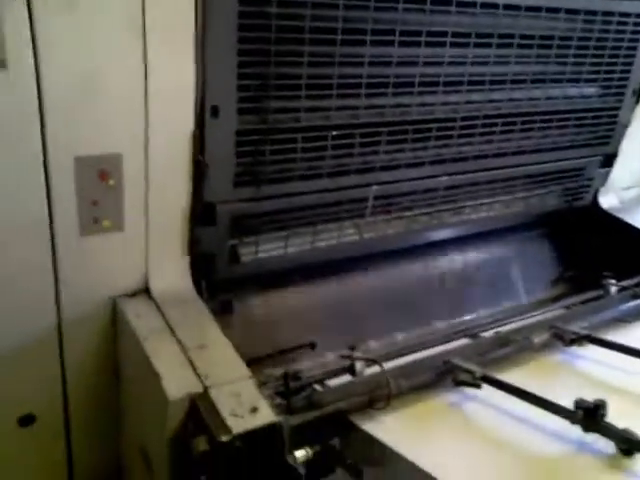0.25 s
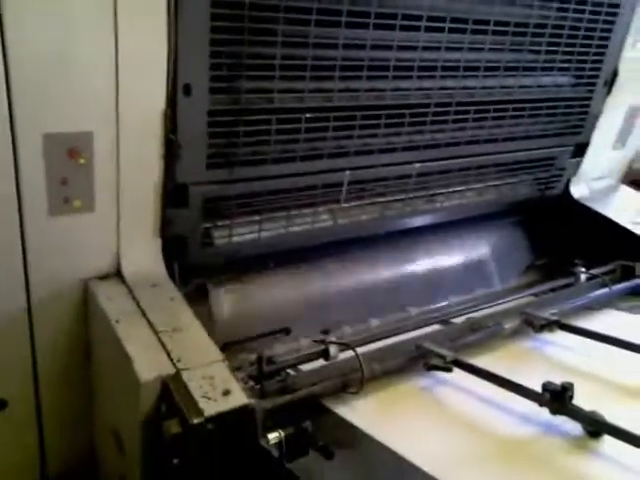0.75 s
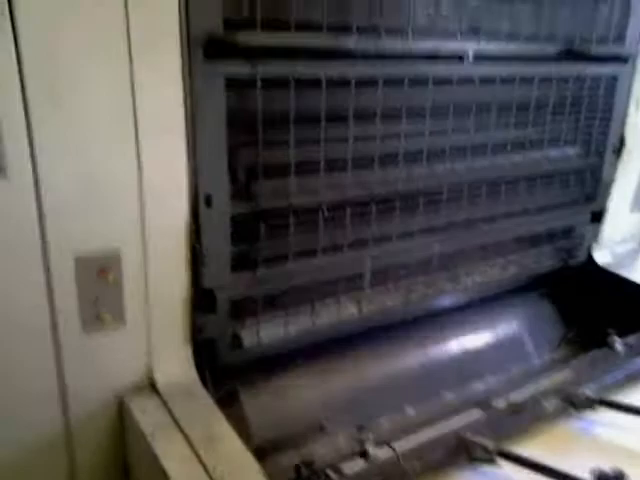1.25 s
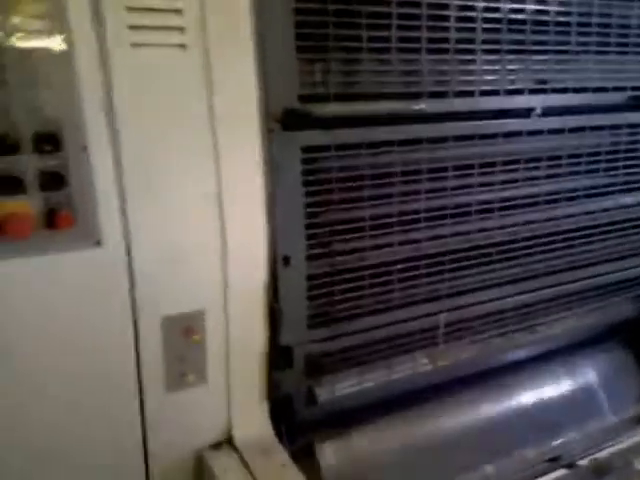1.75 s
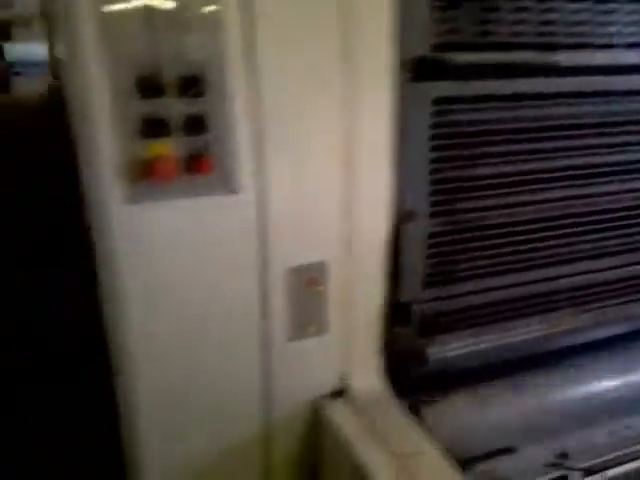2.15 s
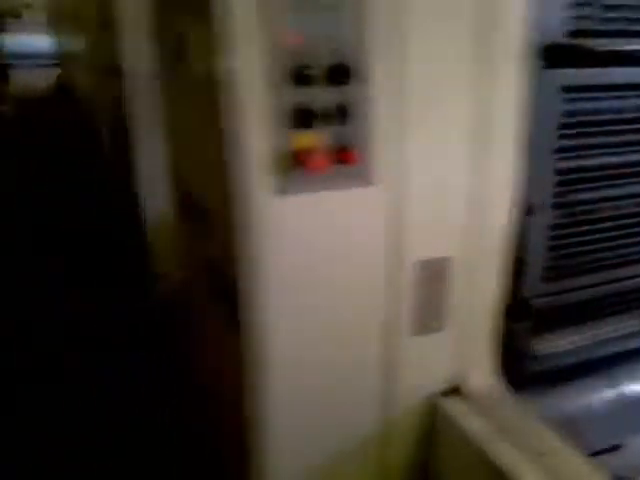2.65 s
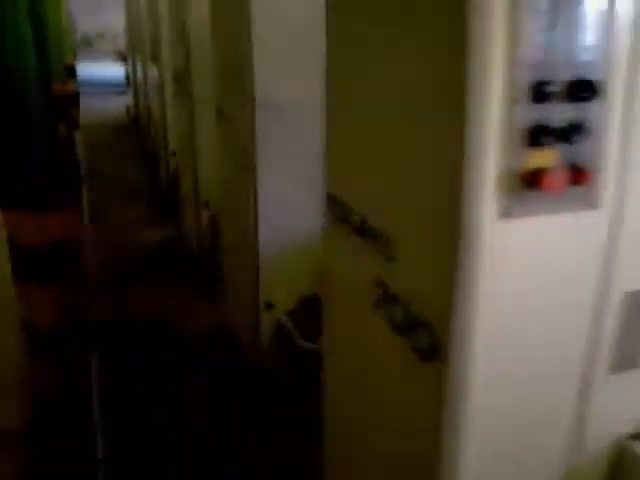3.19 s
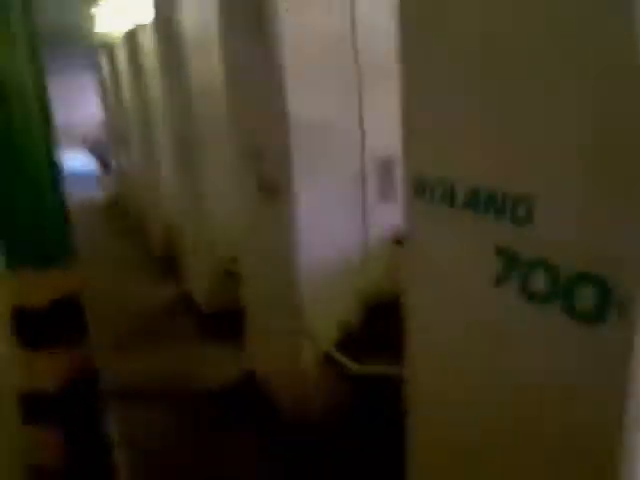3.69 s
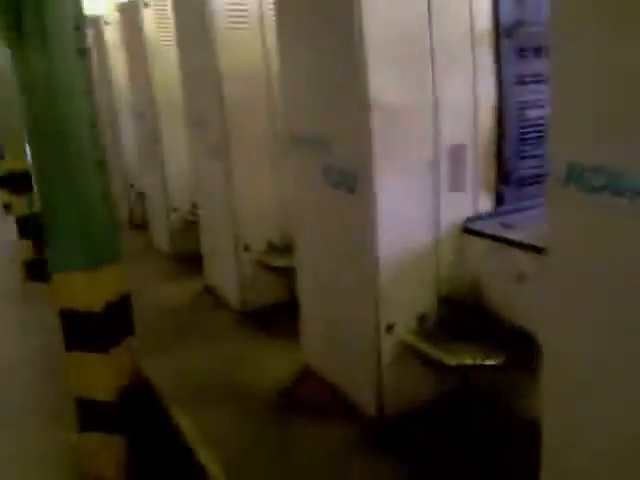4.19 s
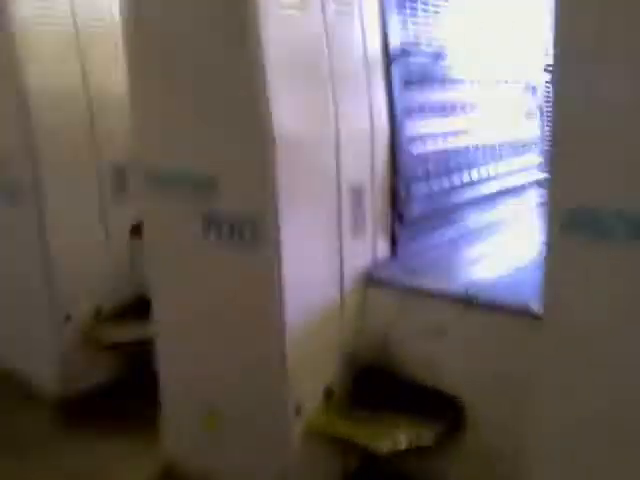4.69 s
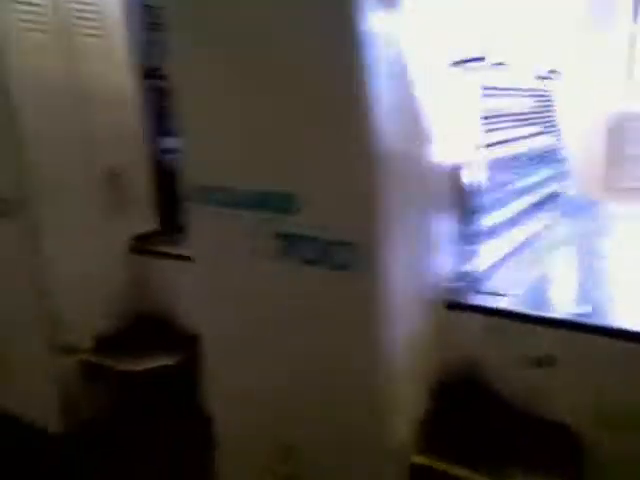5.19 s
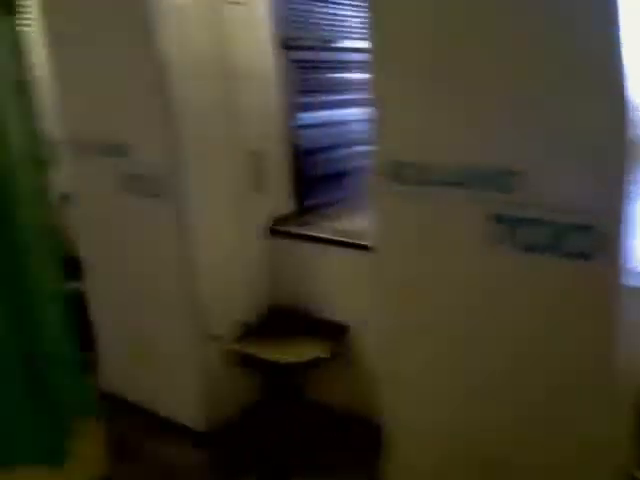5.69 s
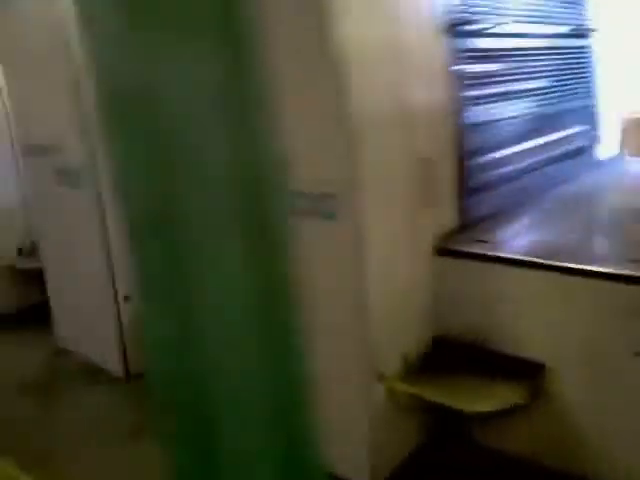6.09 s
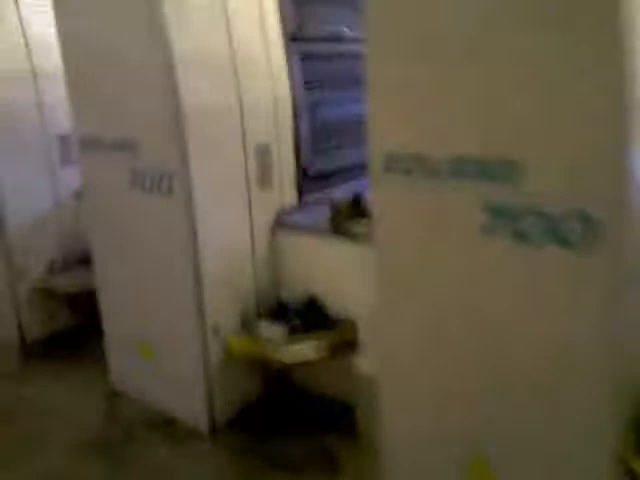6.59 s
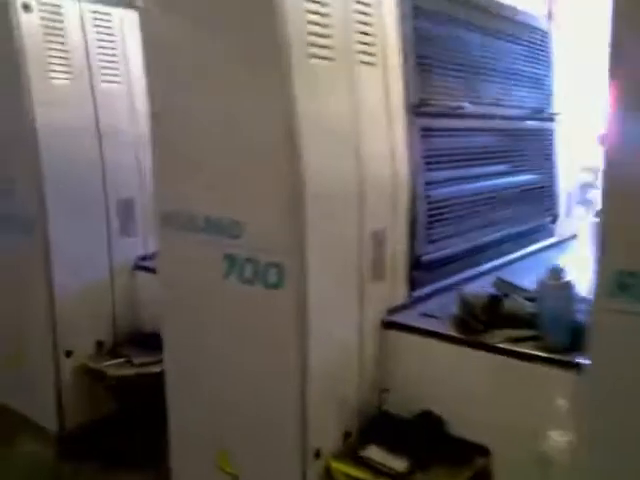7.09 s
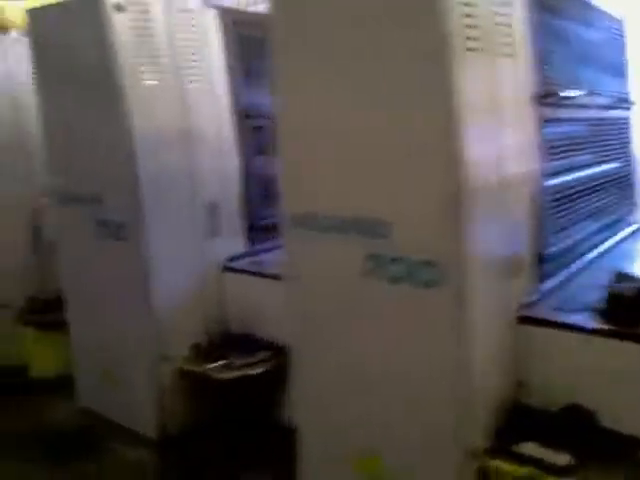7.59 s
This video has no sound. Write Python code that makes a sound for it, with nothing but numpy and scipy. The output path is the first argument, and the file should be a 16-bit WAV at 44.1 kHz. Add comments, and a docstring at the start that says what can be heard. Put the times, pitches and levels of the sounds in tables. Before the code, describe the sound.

Fast regular double metal clanks and dull thuds pound through a dense machine roar, suction puffs fading along the press, with thin, crackly sound.

```python
"""A sheet-fed printing press at full speed: each sheet brings two gripper clanks, two frame thuds and suction hiss.
Struck parts are damped modes plus noise; din and air are shaped noise, rattle is random impacts, whines are sines.
The listener starts near the feeder and walks off along the printing units: suction falls, blows blur into echo.
A narrow-band recorder thins the bass and limits peaks; treble crackles, timed by table, and faint ticks are added."""
import sys
import numpy as np
from scipy import signal
from scipy.fft import rfft, irfft
from scipy.io import wavfile
from scipy.ndimage import uniform_filter1d, minimum_filter1d

SR = 44100
rng = np.random.default_rng(int(sys.argv[2]) if len(sys.argv) > 2 else 0)


def to_wav(s):
    """Save 16-bit WAV."""
    ch = np.atleast_2d(s).T  # columns
    pcm = np.round(np.clip(ch, -1, 1) * 32767)  # PCM
    wavfile.write(sys.argv[1], SR, pcm.astype(np.int16))


N = 346185
FRAMES = N // 256 + 5  # noise frames, 256 samples apart

# Levels are ahead of echo mix and recorder; spectrum and mode levels are relative.
# walk: t/s, distance from feeder/m
WALK = [(0, 1.46), (1.5, 1.26), (2.4, 1.18), (3.2, 2.64), (5, 2.87), (6.6, 3.1), (7.85, 3.7)]
# din spectrum: f/Hz, density level/dB
DIN_SPECTRUM = [(20, -34.5), (45, -10), (80, -11), (100, -6.5), (125, -7.5), (160, -11), (210, -1.5),
                (245, 1.5), (285, -1.5), (340, 1.5), (480, -7.5), (790, -4.5), (1030, -9), (1410, -8),
                (2000, -6.5), (2650, -10.5), (3330, -6.5), (3700, -9), (4800, -23.5)]
# gear mesh and fan tones, each from a part passed: f/Hz, nearest t/s, rms level there/dB, time to fall 3 dB/s
WHINES = [(590, 4.2, -28.5, .85), (592, 2.4, -34, .5), (590, 6.3, -36, .5), (801, 6.6, -33, .9),
          (801, 3.8, -35, .8), (802, .5, -37, .6), (214, 6.9, -36, .6), (1710, 4.75, -32, .4),
          (1710, .6, -35, 1.2), (1711, 6.8, -37, 1.2), (1866, 4.4, -32, 2.1), (1866, 7.4, -35, .6),
          (1969, .7, -33, 1), (1974, 5.8, -34, 2.5)]
# sheets: first clank t/s, peak level/dB of first clank, second clank, first thud, second thud
SHEETS = [(0.08, 3, 0, -11.5, -20), (0.4437, -1, -1, -10, -18), (0.8018, -0.5, 1.5, -11.5, -14),
          (1.1587, 0.5, 0, -11.5, -13.5), (1.517, 1.5, 0.5, -9, -13), (1.8765, -1, -2, -10.5, -24),
          (2.2386, -1, 0, -11.5, -12), (2.595, -2.5, -2, -12.5, -16), (2.949, -3.5, -3.5, -12.5, -17),
          (3.3187, -2, -3, -16.5, -22), (3.68, -6.5, -2.5, -24, -19), (4.0313, -4, -6, -32, -23),
          (4.3987, -4.5, -3, -19, -20), (4.758, -6.5, -9, -13, -24), (5.12, -6, -3, -14.5, -15),
          (5.469, -3, -7, -17.5, -16.5), (5.829, -2, -3, -25, -18), (6.2, -4, -4.5, -17.5, -20.5),
          (6.5602, -7, -5.5, -22, -20), (6.9115, -5, -5.5, -18, -19.5), (7.279, -6.5, -5, -20, -13.5),
          (7.6401, -8, -1.5, -15.5, -18)]
# suction of one sheet: t from first clank/s, level/dB
AIR_ENVELOPE = [(-.14, -0.5), (-.09, -1.5), (-.03, 1.5), (.03, 1), (.07, -25.5)]
# suction spectrum: f/Hz, density level/dB
AIR_SPECTRUM = [(800, -5.5), (1800, 2.5), (2600, 5.5), (3400, 2.5), (5000, -7.5)]
# crackles: t/s, peak level/dB, rms re peak of the hiss around a tick/dB
CRACKLES = [(0.0598, -34, -33), (0.0832, -19, -32), (0.1115, -19.5, -34), (0.2703, -21, -35),
            (0.354, -25, -30), (0.4433, -23, -28), (0.4733, -24, -27), (0.5886, -32, -27),
            (0.612, -32, -28), (0.6734, -30, -38), (0.7826, -39, -35), (0.8011, -22, -26),
            (0.8174, -21, -31), (0.833, -22, -42), (0.9482, -24, -32), (0.9572, -19.5, -29),
            (0.9744, -28, -31), (1.0226, -33, -33), (1.074, -39, -33), (1.0919, -22, -34),
            (1.159, -21, -29), (1.172, -18, -32), (1.1947, -35, -33), (1.3034, -20, -31),
            (1.3698, -27, -31), (1.436, -31, -30), (1.4636, -40, -36), (1.5224, -28, -31),
            (1.534, -22, -19.5), (1.5594, -22, -29), (1.6656, -21.5, -28), (1.6944, -24, -30),
            (1.7923, -36, -23), (1.8811, -24, -33), (1.8891, -23, -25), (1.9066, -21, -33),
            (2.019, -30.5, -26), (2.2353, -38, -35), (2.249, -23, -31), (2.322, -17, -28),
            (2.3531, -22, -37), (2.3835, -19, -36), (2.4085, -24, -30), (2.6075, -26, -25),
            (2.6284, -26, -37), (2.8399, -38, -33), (2.976, -38, -24), (3.1123, -35, -31),
            (3.1273, -23, -34), (3.8944, -47, -32), (4.0375, -20, -55), (4.7727, -31, -33.5),
            (5.1352, -37, -31.5), (5.1487, -31, -32.5), (5.2694, -42, -30), (5.7548, -24, -43),
            (7.458, -30.5, -36)]
# crackle spectrum: f/Hz, density level/dB
CRACKLE_SPECTRUM = [(4300, 8.5), (4700, 9), (4900, 1), (5600, 6), (7000, 5.5), (9000, 1.5), (11000, -1),
                    (12500, -11)]
# clearest dull ticks just above the band: t/s, peak level/dB
SPITS = [(3.3398, -42), (3.497, -41), (3.5488, -39), (4.1614, -37), (4.4488, -39), (5.4645, -42),
         (5.894, -44), (5.9708, -42), (6.3006, -52), (6.4048, -50), (6.4742, -46), (6.5904, -46.5),
         (6.6139, -41), (6.8543, -46), (7.0549, -50), (7.2579, -48), (7.7867, -46)]
# gripper bar modes: f/Hz, level/dB, t60/s
GRIPPER_MODES = [(772, -3.5, 0.075), (1107, -6, 0.043), (1290, -13.5, 0.15), (1380, -18, 0.053),
                 (1640, -4, .09), (1700, -5, .09), (1785, -4, .12), (1822, -3, .12), (1955, -6, .1),
                 (2130, -4, .08), (2425, -4, 0.058), (2540, -13, 0.026), (3355, -11, 0.084),
                 (3480, -11.5, 0.049)]
# loose parts shaken by a blow: f/Hz, density level/dB
CLATTER_SPECTRUM = [(150, -26), (500, -5), (900, 0.5), (1400, -8), (1900, -4), (2600, -4.5), (3400, -6.5),
                    (4500, -6.5)]
# brief loud peaks in the roar: t/s, peak level/dB
LOUD_PEAKS = [(0.28, -11), (0.679, -8), (1.03, -4), (1.09, -15), (1.389, -13), (1.439, -20), (1.789, -6),
              (2.349, 3.5), (3.129, -5.5), (4.771, -1), (5.139, -4), (5.749, -6), (7.453, -14)]
# press frame modes: f/Hz, level/dB, t60/s
FRAME_MODES = [(255, -10, .12), (286, 0, .26), (345, -13, .1)]
# modes of one knock close by: f/Hz, level/dB, t60/s
KNOCK_MODES = [(478, -4, 0.16), (604, -10, 0.12), (746, -4, 0.075)]

DIN_DB, DIN_DB_PER_DECADE = -12.5, -1.5  # rms at 1 m, change over ten times the distance
DIN_TREBLE_DB = -0.6  # treble trim
RATTLE_PER_S, RATTLE_DB, RATTLE_SPREAD_DB = 600, -21, 4  # rate, overall rms, size spread
STANDING_DB, STANDING_HZ = 1.2, .3  # tone swell as the listener crosses standing waves
BEAT_DB, BEAT_HZ, PITCH_WAVER = 2.2, 3.0, .0009  # echo beat, rate of beat and waver, relative pitch rms
AIR_DB, AIR_DB_PER_DECADE = -16.5, -16  # level at 1 m ahead of the envelope, change with distance
HISS_BEFORE_S, HISS_AFTER_S = 0.025, .032  # spread of the hiss around a tick
SPITS_PER_S, SPIT_DB, SPIT_SPREAD_DB = 58, -58, 6  # random dull ticks: rate, median peak, spread
SPIT_TILT_DB_PER_OCT = -45
SECOND_CLANK_S, FIRST_THUD_S, SECOND_THUD_S = .139, 0.01417, .215  # delays
THUD_RISE_S, THUD_SPREAD = .008, .012  # swell, relative pitch scatter
KNOCK_S, KNOCK_DB = 2.312, -3.5  # start, peak
ECHO_M, ECHO_T60_S = 1.77, 0.46  # distance where a blow and its echo are equally loud, decay
MIC_HZ = 84  # microphone bass roll-off
BAND_HZ, SKIRT_HZ, SKIRT_DB = 3743, 4400, -18  # band edge, then a weak shelf: edge, level
LIMIT_PEAK, LIMITER_S = .94, 0.00028  # limiter level, time over which its gain bends
EDGE_HZ = 13000  # final lowpass


def gain_of(db):
    """Decibels to an amplitude factor."""
    return 10 ** (np.asarray(db) / 20)


def evened(x):
    """Scales to rms 1."""
    return x / np.sqrt(np.mean(x ** 2) + 1e-20)


def spectrum_db(points, hz):
    """Interpolates a spectrum table on a log-frequency axis."""
    f, level_db = np.transpose(points)
    return np.interp(np.log(hz + 1), np.log(f + 1), level_db)


def curve(table, t):
    """Second column of a time table at the times t."""
    times, values = np.transpose(table)
    return np.interp(t, times, values)


def distance_m(t):
    """Distance from the feeder at the times t."""
    return np.maximum(curve(WALK, t), .3)


def add(mix, start_s, sound):
    """Adds a sound in place, trimmed to the mix."""
    at = round(start_s * SR)
    part = mix[max(at, 0):][:len(sound) + min(at, 0)]
    part += sound[max(-at, 0):][:len(part)]


def coloured(field_db):
    """Noise whose short-time level follows a field of bins by frames."""
    real, imag = rng.standard_normal((field_db.shape[1], 513, 2)).T
    spectra = (real + 1j * imag) * gain_of(field_db)
    return signal.istft(spectra, nperseg=1024, noverlap=768)[1][:N]


def drift(hz):
    """Random drift of rms 1: one-pole lowpassed noise in 64-sample steps, interpolated."""
    pole = np.exp(-2 * np.pi * hz * 64 / SR)
    steps = signal.lfilter([1], [1, -pole], rng.standard_normal(N // 64 + 2))
    return np.interp(np.arange(N) / 64, np.arange(len(steps)), evened(steps))


def din():
    """Rollers, chains and fans: dense noise in drifting patches, with a flutter shared by the upper bands."""
    hz = np.fft.rfftfreq(1024, 1 / SR)
    patches = rng.standard_normal((FRAMES, len(hz))).T
    patches = uniform_filter1d(patches, size=12, axis=0)  # across frequency
    patches = evened(uniform_filter1d(patches, size=10, axis=1))  # across time
    flutter = evened(uniform_filter1d(rng.standard_normal(FRAMES), size=4))
    treble = np.clip(np.log2((hz + 1) / 700) / 2, 0, 1)[:, None]
    shared = np.clip(np.log2((hz + 1) / 300) / 2, 0, 1)[:, None]
    field_db = spectrum_db(DIN_SPECTRUM, hz)[:, None] + treble * DIN_TREBLE_DB
    field_db = field_db + 0.74 * patches + 0.55 * shared * flutter
    level_db = DIN_DB + DIN_DB_PER_DECADE * np.log10(distance_m(np.arange(N) / SR))
    return gain_of(level_db) * evened(coloured(field_db))


def rattle():
    """Chain links and rollers: random impacts, each ringing one short metal part."""
    size_db = RATTLE_SPREAD_DB * np.minimum(rng.exponential(1, N), 4)
    impacts = gain_of(size_db) * (rng.random(N) < RATTLE_PER_S / SR)
    part, t, out = rng.integers(0, 24, N), np.arange(1500) / SR, np.zeros(N)
    for k, hz in enumerate(np.geomspace(450, 3500, num=24)):
        ring = np.sin(2 * np.pi * hz * t) * gain_of(-60 * t / .025)
        out += signal.oaconvolve(impacts * (part == k), ring)[:N]
    return gain_of(RATTLE_DB) * evened(out)


def whines():
    """Gear and fan tones that swell as they are passed, waver a little and beat with their echoes."""
    t, out = np.arange(N) / SR, np.zeros(N)
    for hz, nearest_s, db, span_s in WHINES:
        level_db = db + STANDING_DB * drift(STANDING_HZ) + BEAT_DB * drift(BEAT_HZ)
        passing = 1 / np.hypot(1, ((t - nearest_s) / span_s) ** 5)
        phase = 2 * np.pi * np.cumsum(hz * (1 + PITCH_WAVER * drift(BEAT_HZ))) / SR
        out += gain_of(level_db) * passing * np.sqrt(2) * np.sin(phase)
    return out


def air():
    """Suction head: shaped noise gated as it lifts each sheet, weaker with distance."""
    hz, gate = np.fft.rfftfreq(1024, 1 / SR), np.zeros(N)
    t = np.arange(AIR_ENVELOPE[0][0], AIR_ENVELOPE[-1][0], 1 / SR)
    for s, *_ in SHEETS:
        level_db = AIR_DB + AIR_DB_PER_DECADE * np.log10(distance_m(s))
        add(gate, s + t[0], gain_of(level_db + curve(AIR_ENVELOPE, t)))
    shape_db = spectrum_db(AIR_SPECTRUM, hz) - 60 * (hz > SKIRT_HZ)
    return gate * evened(coloured(np.outer(shape_db, np.ones(FRAMES))))


def crackle():
    """Treble crackles: tight clusters of bright ticks, hiss around a tick, and faint dull ticks at random."""
    t, ticks, hiss_power = np.arange(-.09, .12, 1 / SR), np.zeros(N), np.zeros(N)
    around = np.exp(-(t / np.where(t < 0, HISS_BEFORE_S, HISS_AFTER_S)) ** 2)
    for s, db, hiss_db in CRACKLES:
        add(hiss_power, s + t[0], gain_of(2 * (db + hiss_db)) * around)
        cluster = rng.choice([-1., 1.], size=60) * (rng.random(60) < .05) * .7
        add(ticks, s, gain_of(db) * np.r_[1, cluster])
    spits = gain_of(SPIT_DB + SPIT_SPREAD_DB * rng.standard_normal(N)) * (rng.random(N) < SPITS_PER_S / SR)
    for s, db in SPITS:
        add(spits, s, gain_of([db]))

    hz = np.fft.rfftfreq(512, 1 / SR)
    bright = gain_of(spectrum_db(CRACKLE_SPECTRUM, hz) - 60 * (hz < SKIRT_HZ))
    dull = bright * gain_of(SPIT_TILT_DB_PER_OCT * np.log2(np.maximum(hz / SKIRT_HZ, 1)))
    tick = np.roll(irfft(bright), 256) * np.hanning(512)
    spit = np.roll(irfft(dull), 256) * np.hanning(512)
    hiss = evened(signal.oaconvolve(rng.standard_normal(N), tick, "same"))
    out = signal.oaconvolve(ticks, tick / tick.max(), "same")
    out += np.sqrt(hiss_power) * hiss
    return out + signal.oaconvolve(spits, spit / spit.max(), "same")


def ringing(modes, t, hz_scale=1.):
    """Sum of a part's damped modes."""
    return sum(gain_of(db - 60 * t / t60) * np.sin(2 * np.pi * hz * hz_scale * t) for hz, db, t60 in modes)


def strike(modes, contact_s, clatter_db, clatter_t60_s=0.2, tilt_db_per_oct=0.):
    """A short rattle of contacts rings a part's modes and shakes loose parts; peak 1."""
    t = np.arange(round(.3 * SR)) / SR
    hz = np.fft.rfftfreq(len(t), 1 / SR)
    contacts = rng.standard_normal(len(t)) * t / contact_s * np.exp(-t / contact_s)
    ring = signal.fftconvolve(contacts, ringing(modes, t))[:len(t)]
    loose_db = spectrum_db(CLATTER_SPECTRUM, hz) - 60 * (hz > SKIRT_HZ)
    loose = irfft(rfft(rng.standard_normal(len(t))) * gain_of(loose_db), len(t))
    loose *= (1 - np.exp(-t / contact_s)) ** 2 * gain_of(-60 * t / clatter_t60_s)
    sound = evened(ring) + gain_of(clatter_db) * evened(loose)
    sound = irfft(rfft(sound) * gain_of(tilt_db_per_oct * np.log2((hz + 100) / 1500)), len(t))
    return sound / abs(sound).max()


def clanks():
    """Grippers close and open once a sheet, striking the bar; the opening is brighter."""
    out = np.zeros(N)
    for s, first_db, second_db, *_ in SHEETS:
        start_s = s - .006  # contact begins just before the clank is heard
        add(out, start_s, gain_of(first_db) * strike(GRIPPER_MODES, 0.0065, 0.87))
        second = strike(GRIPPER_MODES, 0.0065, 2.7, tilt_db_per_oct=1.7)
        add(out, start_s + SECOND_CLANK_S, gain_of(second_db) * second)
    return out


def hall(x, t60_s):
    """Sparse decaying echoes of random sign from machine rows and walls; unit energy."""
    echoes = np.zeros(SR // 2)
    at = np.arange(200, len(echoes) - 20, 20)
    at = at + rng.integers(0, 20, len(at))
    echoes[at] = rng.choice([-1., 1.], len(at)) * gain_of(-60 * at / SR / t60_s)
    return signal.fftconvolve(x, echoes / np.linalg.norm(echoes))[:N]


def thud(hz_scale):
    """The frame swells quickly and rings out on its low modes; peak 1."""
    t = np.arange(round(.3 * SR)) / SR
    ring = ringing(FRAME_MODES, t, hz_scale) * (1 - np.exp(-(t / THUD_RISE_S) ** 2))
    return ring / abs(ring).max()


def thuds():
    """The frame thuds after each clank, its pitch scattered from blow to blow."""
    out, scale = np.zeros(N), 1 + THUD_SPREAD * rng.standard_normal((len(SHEETS), 2))
    for (s, *_, first_db, second_db), (first, second) in zip(SHEETS, scale):
        add(out, s + FIRST_THUD_S, gain_of(first_db) * thud(first))
        add(out, s + SECOND_THUD_S, gain_of(second_db) * thud(second))
    return out


def loud_peaks():
    """Very brief bursts of fast-dying noise with some ringing."""
    out = np.zeros(N)
    for s, db in LOUD_PEAKS:
        add(out, s - .002, gain_of(db) * strike(GRIPPER_MODES, 0.00062, 8.2, clatter_t60_s=0.051))
    return out


def knock():
    """One knock close by: three low modes with little clatter."""
    out = np.zeros(N)
    add(out, KNOCK_S, gain_of(KNOCK_DB) * strike(KNOCK_MODES, .003, -12))
    return out


def scene():
    """Clanks, loud peaks and knock trade direct sound for echo with distance; the other sources stay dry."""
    near = clanks() + loud_peaks() + knock()
    wet = 1 / (1 + (ECHO_M / distance_m(np.arange(N) / SR)) ** 2)  # echo share of power
    blurred = np.sqrt(1 - wet) * near + np.sqrt(wet) * hall(near, ECHO_T60_S)
    return (din() + rattle() + whines() + air() + blurred + thuds())[None]


def record(dry):
    """Bass cut, narrow band with a weak shelf, look-ahead peak limiter, added crackle, final lowpass."""
    def lowpass(length, hz):
        return signal.firwin(length, hz, window=("kaiser", 9), fs=SR)

    thin = signal.sosfilt(signal.butter(2, MIC_HZ, "high", fs=SR, output="sos"), dry)
    band, skirt = lowpass(401, BAND_HZ), lowpass(401, SKIRT_HZ)
    narrow = signal.oaconvolve(thin, (band + gain_of(SKIRT_DB) * (skirt - band))[None], "same")
    span = 2 * round(LIMITER_S * SR) + 1
    bend = np.hanning(span) / np.hanning(span).sum()
    cut = 1 - minimum_filter1d(LIMIT_PEAK / np.maximum(abs(narrow), LIMIT_PEAK), size=span, axis=1)
    cut = signal.oaconvolve(cut, bend[None], "same")
    held = narrow * (1 - cut) + crackle()
    return signal.oaconvolve(held, lowpass(511, EDGE_HZ)[None], "same")


dry = scene()
out = record(dry)
to_wav(out)
```